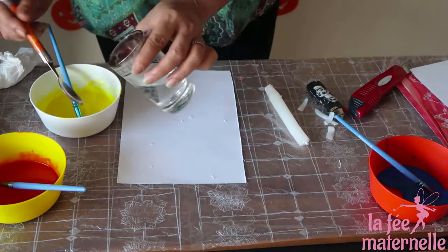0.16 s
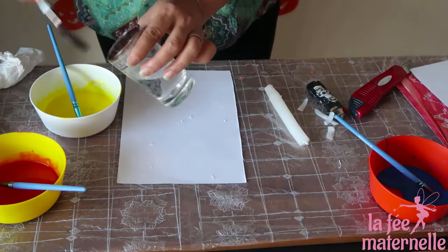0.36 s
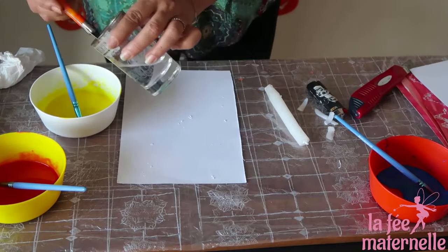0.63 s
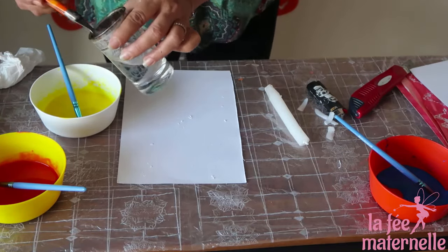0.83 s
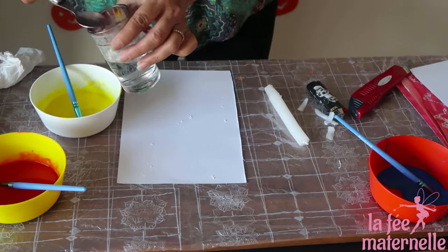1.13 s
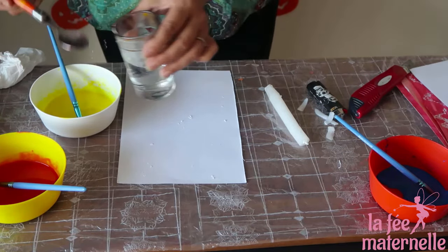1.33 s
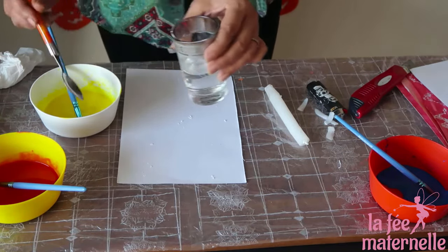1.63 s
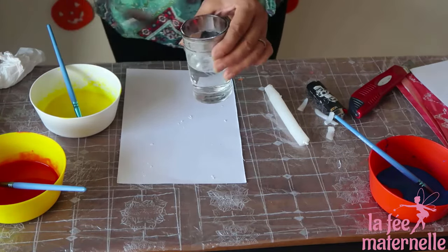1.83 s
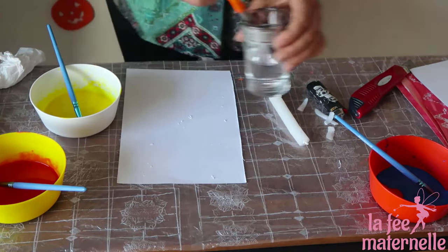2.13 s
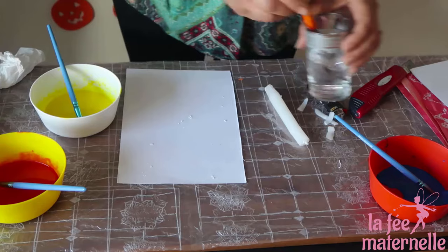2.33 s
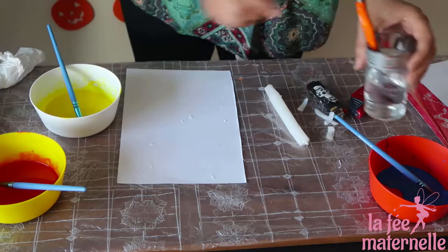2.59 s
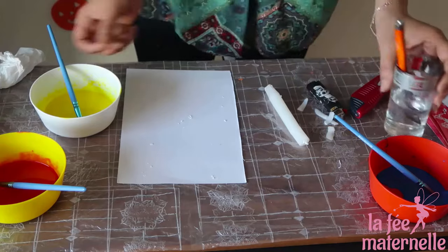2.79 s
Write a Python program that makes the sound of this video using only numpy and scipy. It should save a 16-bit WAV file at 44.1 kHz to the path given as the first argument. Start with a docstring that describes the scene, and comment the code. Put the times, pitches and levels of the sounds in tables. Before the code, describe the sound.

A metal spoon taps a hand-held glass of water indoors. After quiet room noise and a faint low machine hum, small damped clinks come at about 0.6, 0.9, 1.0 and 1.2 seconds. A pause follows, then a very loud, bright clink at 2.1 as the spoon drops in, with quick rattles until about 2.35. Hard walls return a short glassy ring, fading back to faint hum.

```python
"""Spoon taps on a hand-held glass of water

A steel spoon taps a hand-held glass of water over a table, then drops into it and rattles: damped modes.
The hand damps the glass, so a hard-walled room carries most of the ring: decaying noise and short swells.
A machine drones nearby in drifting sine lines, over steady filtered room noise.
A camera with gain control and two microphone ports listens from above."""
import sys
import numpy as np
from scipy import signal
from scipy.fft import rfft, irfft, next_fast_len
from scipy.io import wavfile
from scipy.ndimage import uniform_filter1d, minimum_filter1d, map_coordinates

SR = 44100
rng = np.random.default_rng(int(sys.argv[2]) if len(sys.argv) > 2 else 0)


def unload_wav(signal):
    """Save mono or channel-first audio to the path in sys.argv[1] as 16-bit WAV at rate SR, clipped to [-1, 1]."""
    wavfile.write(
        sys.argv[1],
        SR,
        np.round(np.clip(np.atleast_2d(signal).T, -1, 1) * 32767).astype(np.int16),
    )


N = 130095  # length in samples

# Overtone of the glass. Each row: frequency in Hz, relative level in dB, 60 dB decay time in s.
OVERTONES = [(6706, -0.5, 0.05)]


def amp(db):
    """Decibels to an amplitude factor."""
    return 10 ** (np.asarray(db) / 20)


def unit(x):
    """Scale a signal to an rms of one."""
    return x / np.sqrt(np.mean(x ** 2) + 1e-20)


def along(points, hz):
    """Read a curve of (Hz, value) points on a log frequency axis."""
    f, v = np.transpose(points)
    return np.interp(np.log(hz + 1), np.log(f + 1), v)


def wobble(rate):
    """A smooth random curve with rate knots a second."""
    knots = rng.standard_normal(int(N * rate / SR) + 4)
    return map_coordinates(knots, [np.arange(N) * rate / SR])


def filtered(x, response):
    """Multiply the spectrum of x by a response of frequency."""
    n = x.shape[-1]
    m = next_fast_len(n + 8192)  # padding keeps the filter from wrapping round
    spectrum = rfft(x, m) * response(np.fft.rfftfreq(m, 1 / SR))
    return irfft(spectrum, m)[..., :n]


def stereo(pair, alike):
    """Mix two unrelated signals to a left and right of given likeness at each frequency."""
    def mid_side_gains(hz):
        angle = np.arccos(np.clip(along(alike, hz), -1, 1)) / 2
        return np.array([np.cos(angle), np.sin(angle)])
    mid, side = filtered(pair, mid_side_gains)
    return np.array([mid + side, mid - side])


def air():
    """Steady room noise: shaped noise whose level wanders slightly, wider apart in the treble."""
    # Noise spectrum. Each row: frequency in Hz, relative density in dB.
    spectrum = [(15, -53.5), (25, -16.5), (49, -6), (74, -17.5), (129, -6), (160, -10.5), (287, -13.5),
                (328, -15.5), (405, -14.5), (514, -20), (1490, -19.5), (2810, -29), (3380, -31),
                (12700, -47.5), (14200, -59.5)]
    # Each row: frequency in Hz, left-right likeness from -1 to 1.
    likeness = [(60, 0.99), (130, 1), (280, 0.64), (620, 0.19), (1340, 0.84), (2900, 0.084), (6310, 0.04),
                (13700, 0)]
    level_db = -50 + 0.41 * wobble(2.5)
    pair = filtered(rng.standard_normal((2, N)), lambda hz: amp(along(spectrum, hz)))
    return amp(level_db) * unit(stereo(pair, likeness))


def drone():
    """Machine drone: a beating low pair, three drifting hums and a whine of narrow-band noise."""
    # Beating pair. Each row: frequency in Hz, drift in Hz, relative level in dB.
    beating = [(119, 3, -2), (129.8, 3, -0.5)]
    # Level of the pair. Each row: time in seconds, level in dB.
    beating_level = [(0.0, -58), (0.16, -48.5), (0.19, -60), (0.29, -44), (0.33, -67), (0.39, -42.5),
                     (0.48, -62), (0.5, -52.5), (0.98, -58), (1.14, -48.5), (1.16, -58.5), (2.03, -54),
                     (2.22, -66), (2.48, -56.5), (2.55, -66), (2.58, -61), (2.92, -57), (2.95, -61)]
    # Hums. Each row: frequency in Hz, drift in Hz.
    hums = [(217, 2), (271, 3), (296, 2)]
    # Each row: time in seconds, then the level of each of the three hums in dB.
    hum_levels = [(0.0, -68, -72, -73), (0.29, -62, -63.5, -66), (0.37, -79, -58.5, -63),
                  (0.85, -56, -63, -66), (1.2, -61.5, -78, -52.5), (1.34, -64.5, -64.5, -65),
                  (1.96, -55, -69, -57.5), (2.23, -58.5, -73, -75), (2.93, -62, -72, -61.5),
                  (2.95, -78, -70, -71)]
    whine_hz, whine_width_hz, whine_db = 13140, 40, -92
    t = np.arange(N) / SR

    def line(hz, drift):
        """A sine of unit rms whose pitch wanders."""
        cycles = np.cumsum(hz + drift * wobble(5.6)) / SR
        return np.sqrt(2) * np.sin(2 * np.pi * (rng.random() + cycles))

    def levels(rows):
        times, *columns = np.transpose(rows)
        return [amp(np.interp(t, times, db)) for db in columns]

    pair = unit(sum(amp(db) * line(hz, drift) for hz, drift, db in beating))
    pair = levels(beating_level)[0] * pair
    hum = sum(gain * line(hz, drift) for gain, (hz, drift) in zip(levels(hum_levels), hums))
    whine = unit(filtered(rng.standard_normal(N),
                          lambda f: np.exp(-((f - whine_hz) / whine_width_hz) ** 2)))
    return pair + hum + amp(whine_db) * whine


def ring(modes, t, scale=1, detune=0):
    """Sum damped sine modes, each struck at a slightly random level and, if detuned, pitch."""
    scatter_db = 2.5
    total = 0
    for hz, db, t60 in modes:
        level_db = db + scatter_db * rng.standard_normal()
        pitch = scale * hz * (1 + detune * rng.standard_normal())
        total = total + amp(level_db - 60 * t / t60) * np.sin(2 * np.pi * pitch * t)
    return total


def direct(x, pan_db):
    """A sound at the two microphone ports: a level offset and a phase lead that varies with frequency."""
    # Each row: frequency in Hz, phase by which the left port leads in radians.
    ports = [(3000, .1), (5200, .5), (6600, 1.5), (8400, .8), (12000, 1.5)]
    sides = np.array([[.5], [-.5]])
    return amp(pan_db * sides) * filtered(x, lambda f: np.exp(1j * sides * along(ports, f)))


def room(x):
    """The hard room's answer to one tap: a noise tail in which each frequency dies at its own speed."""
    # Each row: frequency in Hz, 60 dB decay time in s.
    decay = [(300, 0.2), (1300, .65), (3000, 0.7), (4200, .55), (6500, .55), (8500, .45), (11000, 0.46),
             (14000, 0.19)]
    # Each row: frequency in Hz, relative level in dB.
    colour = [(300, 0.5), (1300, -0.5), (2300, 0.5), (3000, 0), (4000, 2.5), (6500, 0.5), (8500, 0.5),
              (11000, 2.5), (14000, -1)]
    # Each row: frequency in Hz, left-right likeness from -1 to 1.
    likeness = [(500, .7), (1300, 1), (2300, 1), (4100, .65), (7500, -.15), (13000, -1.1)]
    gap_s, rise_s = 0.0046, 0.0042
    hz, t, noise = signal.stft(rng.standard_normal((2, SR)), SR, nperseg=256)
    decay_db = -60 * t / along(decay, hz)[:, None]
    shaped = noise * amp(along(colour, hz)[:, None] + decay_db)
    tail = signal.istft(shaped, SR, nperseg=256)[1][:, :SR]
    since_gap = np.clip(np.arange(SR) / SR - gap_s, 0, None)
    tail = stereo(tail, likeness) * (1 - np.exp(-since_gap / rise_s))
    return signal.fftconvolve(x[None], tail / np.linalg.norm(tail[0]), axes=1)


def taps():
    """Spoon on glass: every contact rings the modes of both, cracks, knocks and wakes the room."""
    # Each row: start in seconds, level in dB, glass pitch in Hz, then levels in dB of the overtone,
    # top overtones, spoon bowl, neck, stem, tip and crack, knock pitch in Hz, knock level in dB,
    # room level in dB, pan in dB (positive to the left).
    contacts = [(0.5675, -17, 2902, -17.5, -9.5, -15, -18, -9.5, -13, -16, 2050, -10, -3.5, 1.5),
                (0.5751, -26.5, 2924, -10, 1, -20, -10, 4, -20, 0.5, 2280, -16, -1.5, 0),
                (0.6384, -22, 2763, -28, -16, -15, -8.5, -16, -30, -13, 2270, -16, -6.5, 2),
                (.8981, -30, 2890, -10, -8, -23, -9, -12, -30, -8.5, 1560, -2.5, -7, -1),
                (0.9003, -31.5, 2560, -23, -11, -14, -12, -12, -28, -13, 1560, -5, -8, -1),
                (0.9075, -34.5, 2855, -9, 0, -16, -7.5, 1, -30, -0.5, 1450, -9, 2, 8),
                (1.018, -25.5, 2900, -12.5, -14, -17, -21, -12, -35, -15, 1410, -15, -6, 2),
                (1.189, -24.5, 2877, -11, -4, -4, -18, -10, -35, -1, 1250, -12, -2, 2),
                (1.1963, -23.5, 2950, -10.5, -1.5, -4, -24, -6, -35, -10.5, 2140, -14, 0.5, 2.5),
                (2.065, -37, 3130, -20, -19.5, -11, -20, -20, -35, -12, 1300, -12, -4, 0),
                (2.078, 1.5, 2949, -18, -8, -12.5, -22, -19, -40, -14, 2397, -14.5, -1, 0.5),
                (2.0816, -6.5, 3003, -10, -5, -13, -19.5, -14, -40, -14, 1243, -11, -0.5, -0.5),
                (2.1246, -12.5, 3070, -4.5, -20, -8.5, -10.5, -8, -35, -4, 1420, -4, -2.5, -1),
                (2.1333, -14.5, 2840, -9.5, -12.5, -5, -14, -14, -35, -14, 1425, -2.5, -4, -1),
                (2.2907, -23, 2930, -10, -5.5, -3.5, -13, -9, -18, -8.5, 1270, -5.5, 3.5, -1),
                (2.3158, -21, 2620, -14, -6.5, -9.5, -17, -6, -14, -11, 1204, -8.5, -2, 1)]
    # Glass, then knock. Each row: ratio to the pitch, relative level in dB, 60 dB decay time in s.
    glass_modes = [(1, 0.5, 0.027), (1.004, -14.5, 0.14), (.93, -8, .02), (1.17, -13, 0.035)]
    knock_modes = [(1, 2.5, 0.02), (.85, -4.5, 0.01), (1.18, -3, .015)]
    # Top overtones of the glass, then the parts of the spoon.
    # Each row: frequency in Hz (the bowl's is detuned at each tap), relative level in dB, 60 dB decay time in s.
    top_modes = [(11680, 0.5, 0.022), (10680, -7, 0.023), (11060, -11.5, .015), (11830, -9, 0.017)]
    bowl_modes = [(3520, 0, 0.017), (3774, -0.5, 0.018), (4210, -2.5, .014), (4414, -5.5, 0.015),
                  (5130, -11.5, 0.016)]
    neck_modes = [(6150, -4, 0.024), (5715, -9.5, 0.015), (10380, -7, 0.024)]
    stem_modes = [(8450, -5, .045), (8270, -12, .03)]
    tip_modes = [(14080, -14.5, .05)]
    # Spectrum of the crack. Each row: frequency in Hz, relative level in dB.
    crack_spectrum = [(200, -21), (1000, -16.5), (3000, -1.5), (8000, 2.5), (12300, -12), (13000, -31),
                      (20000, -37)]
    thump_modes = [(328, -28.5, 0.068)]  # Hz, dB within the knock, 60 dB decay time in s
    attack_s, crack_t60_s = 0.00065, 0.015
    out = np.zeros((2, N + 2 * SR))
    t = np.arange(SR // 5) / SR
    for (start, db, hz, over_db, top_db, bowl_db, neck_db, stem_db, tip_db, crack_db,
         knock_hz, knock_db, room_db, pan_db) in contacts:
        crack = unit(filtered(rng.standard_normal(len(t)), lambda f: amp(along(crack_spectrum, f))))
        crack = amp(-60 * t / crack_t60_s) * crack
        knock = ring(knock_modes, t, knock_hz) + ring(thump_modes, t)
        glass = ring(glass_modes, t, hz)
        glass = glass + amp(over_db) * ring(OVERTONES, t) + amp(top_db) * ring(top_modes, t)
        spoon = amp(bowl_db) * ring(bowl_modes, t, detune=0.025) + amp(neck_db) * ring(neck_modes, t)
        spoon = spoon + amp(stem_db) * ring(stem_modes, t) + amp(tip_db) * ring(tip_modes, t)
        tap = glass + spoon + amp(crack_db) * crack + amp(knock_db) * knock
        tap = amp(db) * tap * (1 - np.exp(-t / attack_s))
        wet = amp(room_db) * room(tap)
        k = round(start * SR)
        out[:, k:k + len(t)] += direct(tap, pan_db)
        out[:, k:k + wet.shape[1]] += wet
    return out[:, :N]


def echoes():
    """Strong single wall echoes: the glass note comes back as short soft-edged swells."""
    # Each row: start in seconds, level in dB, pitch in Hz, length in s, relative overtone level in dB.
    swells = [(0.5844, -27, 2867, 0.012, -14), (0.6014, -30.5, 3040, 0.01, -16),
              (0.655, -27, 2890, 0.011, -16), (1.2255, -28.5, 2880, 0.012, -18),
              (1.242, -26.5, 2966, 0.011, -14), (1.26, -33, 2980, 0.0086, -14),
              (2.0932, -6.5, 2970, 0.0078, -11.5), (2.138, -8.5, 3030, 0.011, -17),
              (2.204, -16, 2933, 0.0099, -11.5), (2.2305, -20.5, 2962, 0.0097, -8),
              (2.255, -27, 2985, 0.011, -17), (2.276, -22, 2990, 0.012, -17),
              (2.335, -25.5, 2960, 0.011, -18), (2.361, -26, 2940, 0.011, -19)]
    out = np.zeros((2, N))
    for start, db, hz, length, over_db in swells:
        t = np.arange(int(length * SR)) / SR
        overtone = np.sin(2 * np.pi * OVERTONES[0][0] * t)
        note = np.sin(2 * np.pi * hz * t) + amp(over_db) * overtone
        swell = np.sin(np.pi * t / length) ** 0.806
        out[:, round(start * SR):][:, :len(t)] += direct(amp(db) * note * swell, 0)
    return out


def scene():
    """Everything that reaches the camera, before its gain control."""
    return taps() + echoes() + air() + drone()


def record(dry):
    """Camera: gain drops on loud peaks, holds, then climbs back; excess clips and the top is cut."""
    knee_db, slope = -10, 0.39  # slope: dB of gain lost per dB above the knee
    hold_s, smooth_s, recover_db_s = 0.083, 0.0038, 9
    top_hz = 14600
    peak_db = 20 * np.log10(np.abs(dry).max(0) + 1e-9)
    need_db = -slope * np.clip(peak_db - knee_db, 0, None)
    # the origins make both windows look back only
    hold = int(hold_s * SR)
    need_db = minimum_filter1d(need_db, hold, origin=(hold - 1) // 2)
    # a running minimum against a ramp limits how fast the gain climbs
    ramp = recover_db_s * np.arange(N) / SR
    gain_db = np.minimum(np.minimum.accumulate(need_db - ramp) + ramp, 0)
    soft = int(smooth_s * SR)
    gain_db = uniform_filter1d(gain_db, soft, origin=(soft - 1) // 2)
    clipped = np.clip(dry * amp(gain_db), -1, 1)
    return filtered(clipped, lambda hz: 1 / (1 + (hz / top_hz) ** 60))


dry = scene()
out = record(dry)
unload_wav(out)
```